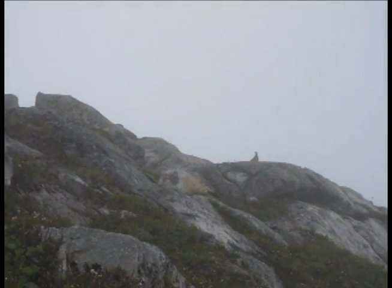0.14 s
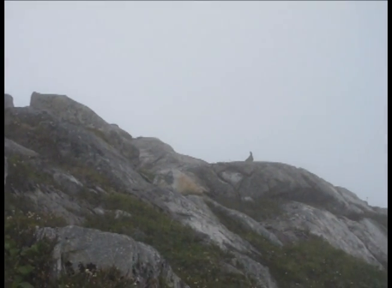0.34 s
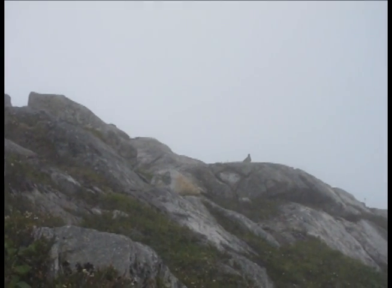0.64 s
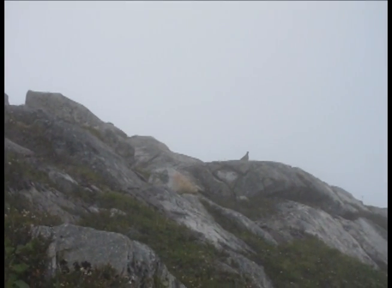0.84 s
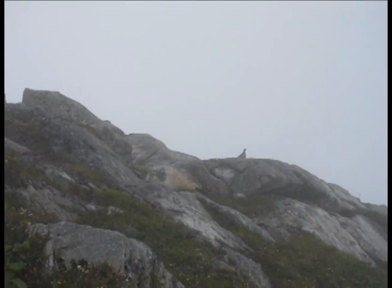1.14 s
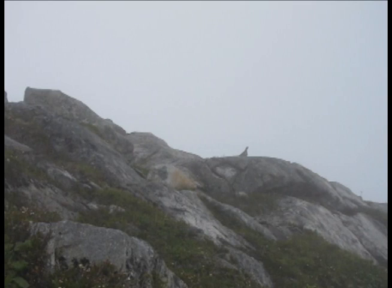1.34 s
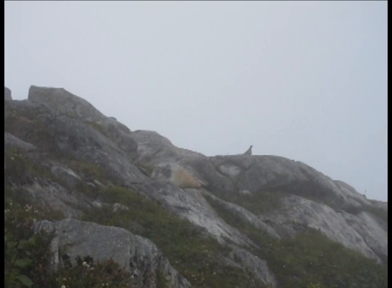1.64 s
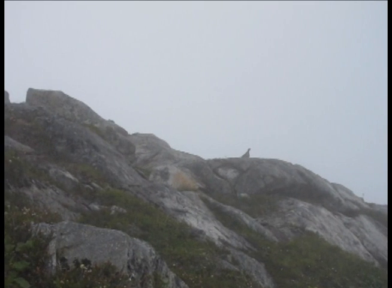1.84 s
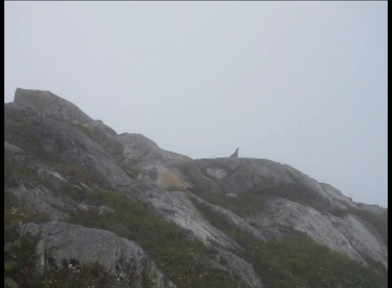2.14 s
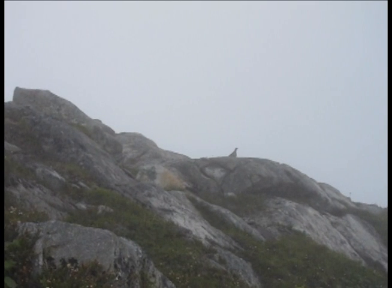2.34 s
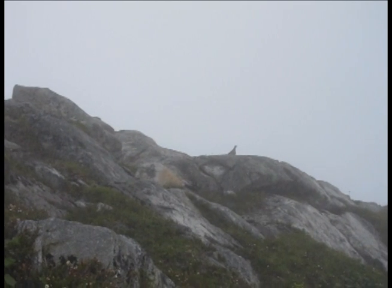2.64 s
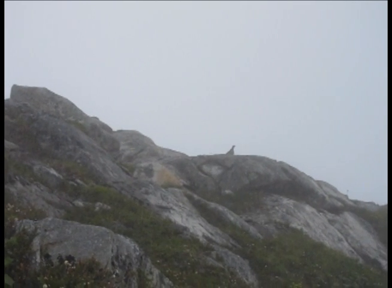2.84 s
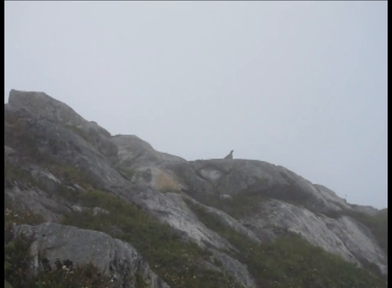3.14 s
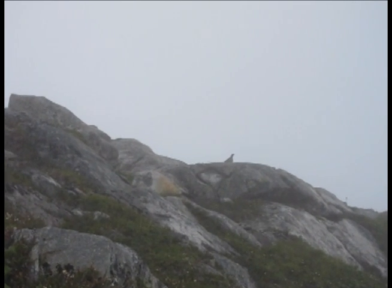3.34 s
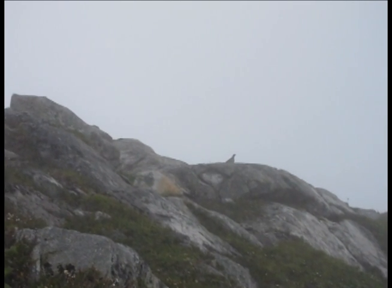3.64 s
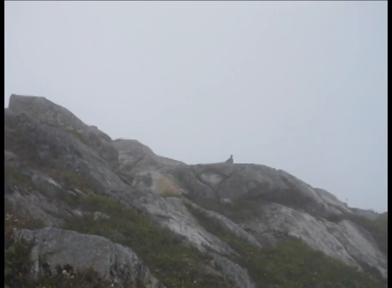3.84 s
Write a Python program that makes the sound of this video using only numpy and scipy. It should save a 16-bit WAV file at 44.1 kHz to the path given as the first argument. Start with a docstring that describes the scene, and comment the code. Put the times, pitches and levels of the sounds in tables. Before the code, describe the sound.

A grouse clucks at about 0.25, 1.55 and 3.2 seconds, each a very short, hollow rattle of quick throat pulses, the last duller, with faint returns from rock. Low wind thumps the microphone until 0.8, stays mostly calm with small bumps near 1.75 and 2.65, thuds at 3.05, then batters strongly from 3.4 to the end. Faint airy hiss swells near 0.6; a barely audible high whirr recurs every second.

```python
"""Grouse on a windy ridge

A grouse clucks three times on a bare ridge: each cluck is a few slow throat pulses ringing the windpipe,
with faint returns from rock. Gusts sweep eddies over the microphone and thump it, above a far wash of air
and a hiss that swells once. A faint high whirr of banded noise comes once a second beside thin tones and one
small tick, and gain control eases loud moments down."""
import sys
import numpy as np
from scipy import signal
from scipy.fft import rfft, irfft
from scipy.io import wavfile
from scipy.ndimage import uniform_filter1d, map_coordinates

SR = 44100
rng = np.random.default_rng(int(sys.argv[2]) if len(sys.argv) > 2 else 0)


def volts_from_db(level):
    """Convert decibel levels to linear amplitude ratios."""
    exponent = np.asarray(level, float) / 20
    return 10 ** exponent


def file_out(sig):
    """Save sig as 16-bit WAV at sys.argv[1]."""
    # one column per channel
    cols = np.atleast_2d(sig).T
    # limit, then scale
    lim = np.clip(cols, -1, 1)
    pcm = np.round(lim * 32767).astype(np.int16)
    wavfile.write(sys.argv[1], SR, pcm)


N = 176400
T = np.arange(N) / SR

# Spectrum of the far air, relative levels: pitch_hz, level_db
WASH = [(35, -26.5), (60, -2), (112, -8.5), (145, -11), (278, -12), (454, -11.5), (690, -16), (1070, -23),
        (1210, -22.5), (1790, -28), (10200, -40), (14500, -46.5), (15600, -49)]
WASH_DB = -48  # rms

# High band that returns regularly; the length is from its top to 1/e
WHIRR_S, WHIRR_EVERY_S, WHIRR_LEN_S = 0.19, 1.0, 0.07
WHIRR_HZ, WHIRR_WIDTH_HZ, WHIRR_DB = 10400, 990, -73
# Thin steady tones, before an 8 dB lift of their peak: pitch_hz, level_db
TONES = [(10045, -99), (14787, -100)]

# Spectrum of the far mid-band swell, relative levels: pitch_hz, level_db
SWELL = [(900, -28), (1180, -9), (1370, 4), (1650, -3), (1850, -10), (2010, -1), (2300, -13), (2650, -6),
         (3100, -17), (4000, -30)]
SWELL_S, SWELL_RISE_S, SWELL_FALL_S, SWELL_DB = 0.59, 0.07, 0.43, -57.5

# Single strong eddies that thump the microphone: start_s (centre), level_db, pitch_hz, direction (push 1, pull -1)
THUMPS = [(.142, -20, 41, 1), (.2254, -19, 41, 1), (.2708, -16, 94, -1), (.2902, -17.5, 48, 1),
          (.4871, -19.5, 34, -1), (.6763, -19, 40, -1), (.7465, -25, 28, -1), (1.7198, -25, 34, 1),
          (1.7861, -22.5, 41, 1), (2.6455, -22, 29, 1), (3.0101, -16.5, 131, 1), (3.0252, -20.5, 41, -1),
          (3.0445, -20, 150, 1), (3.0517, -20, 48, -1), (3.0869, -14, 57, 1), (3.4497, -11.5, 45, 1),
          (3.4721, -11.5, 94, 1), (3.504, -9, 94, 1), (3.523, -11, 60, 1), (3.541, -10, 120, 1),
          (3.58, -12, 90, 1), (3.5993, -11, 94, 1), (3.6588, -8, 182, 1), (3.499, -11, 170, -1),
          (3.7185, -18, 110, -1), (3.6707, -4, 111, 1), (3.6845, -6, 67, 1), (3.7423, -11, 154, 1),
          (3.752, -11, 182, 1), (3.761, -11.5, 300, 1), (3.819, -15, 200, 1), (3.856, -19, 320, 1),
          (3.7728, -10, 215, -1), (3.7973, -8, 280, 1), (3.8328, -6, 105, 1), (3.8721, -10, 300, 1),
          (3.8745, -7.5, 85, 1)]
CREST_DB, CREST_SHARPER, CREST_LAG = -19, 2.2, 0.1  # sharper crest just off the top; random lag in cycles
HUSH, HUSH_CYCLES = 0.7, 0.8  # a strong eddy stills this share of the fine flutter around it

# Buffeting level before a 2.5 dB lift: start_s, level_db
GUST = [(0.0, -45), (0.14, -24.5), (0.18, -30.5), (0.26, -19.5), (0.3, -25), (0.33, -33.5), (0.4, -39.5),
        (0.49, -23), (0.56, -43), (0.61, -41), (0.67, -24.5), (0.71, -37.5), (0.77, -31), (0.95, -41.5),
        (1.28, -40), (1.35, -41.5), (1.51, -40), (1.65, -41), (1.71, -24), (1.75, -31), (1.78, -28),
        (1.9, -41.5), (2.27, -40), (2.43, -30.5), (2.51, -42.5), (2.53, -34.5), (2.61, -36), (2.65, -24.5),
        (2.74, -39.5), (3.09, -20), (3.15, -31), (3.19, -28.5), (3.34, -36), (3.39, -27.5), (3.42, -29.5),
        (3.44, -21.5), (3.53, -17.5), (3.55, -25), (3.63, -20.5), (3.68, -10), (3.71, -24.5), (3.73, -19),
        (3.88, -20.5), (3.9, -29.5), (3.93, -21.5), (4.0, -26)]
# Air speed relative to calm: start_s, speed_db
SPEED = [(0, 0), (.12, -1), (.2, 4.5), (.23, 1), (.27, 6.5), (.32, -2.5), (.5, 0), (.6, -2), (.68, 0.5),
         (1.0, -1), (1.7, -1.5), (1.78, -0.5), (2.4, -2), (2.65, 1), (2.8, 2), (2.97, 3), (3.03, 9.5),
         (3.09, 1.5), (3.3, -0.5), (3.42, 2.5), (3.49, 9.5), (3.56, 8), (3.63, 8), (3.655, 13), (3.68, 10),
         (3.7, 4.5), (3.75, 15.5), (3.8, 15), (3.84, 11), (3.875, 14.5), (3.91, 8.5), (4, 7.5)]
# Spectrum of the eddies at calm speed, relative levels: pitch_hz, level_db
EDDIES = [(3, -8), (8, -1), (20, 5.5), (40, -5.5), (60, -8.5), (90, -16.5), (140, -26), (200, -42),
          (280, -79), (400, -130)]
LUMP_DB, LUMP_HZ, SKEW = 3.5, 15.8, 0.29  # uneven strength, its rate at calm speed, lopsided waveform

# Small dry ticks: start_s, level_db (starting peak), pitch_hz
TICKS = [(1.6846, -45.5, 2560)]

# Clucks, levels before the final halving:
# loudest_s, pulse_rate_hz, level_db, lower_pitch_ratio, upper_pitch_ratio, brightness_db_per_octave
CLUCKS = [(0.2495, 160.8, -23, 1.01, 1.015, 1.5), (1.5655, 152, -21, 0.96, 0.98, -.5),
          (3.2094, 142.4, -24.5, 1.0, 1.07, -6.5)]
# Soft opening pulse of each cluck: start_s
FIRST_PULSE_S = [.2355, 1.5481, 3.1946]
# Windpipe rings, relative levels: pitch_hz, level_db, t60_s
PIPE = [(1125, -5, .012), (1615, 0, .020), (3330, -8, .019), (4570, -14.5, .013)]
# Brief rings at the front of each pulse, relative levels: pitch_hz, level_db, t60_s
SNAP = [(2180, -11.5, 0.002), (3900, -27, 0.0013), (5970, -18, .004), (8200, -32, .003)]
# Starting direction of each ring, windpipe first, then front: direction (1 or -1)
SIGNS = [-1, 1, 1, 1, 1, -1, 1, 1]
# Spectrum of the puff of air, relative levels: pitch_hz, level_db
RASP = [(600, -27), (1300, -4.5), (2400, 4), (4200, -8.5), (6500, -21), (10000, -33)]
RASP_DB, RASP_T60_S = -18, 0.006
OPEN_S, LEAD_RAD = 0.00004, 0.28  # rise constant; the folds snap shut, so rings start a little into their swing
ARCH_DB, ARCH_S, ARCH_POWER = -5.5, 0.012, 2.5  # flat-topped effort: down by ARCH_DB at ARCH_S from the top
FIRST_GAP, SLOW_PER_DB = 1.06, 0.004  # longer first period (in periods); weak effort stretches periods
LIMP_S, JITTER_S = 0.00006, 0.00004  # pulses alternate late and early; all are slightly uneven
DULL_DB, SAG_PER_DB = 1.62, 0.005  # per dB of lost effort: dB per octave duller, lower rings flatter (share)
WOBBLE_DB, WOBBLE = 1.2, 0.008  # random level of each pulse, random pitch share of each ring

ROCK_DB, ROCK_T60_S, ROCK_START_S = -27, 0.12, 0.031


def evened(x):
    """Scales to rms 1."""
    return x / np.sqrt(np.mean(x ** 2) + 1e-20)


def read(points, hz):
    """Reads a spectrum table on a log frequency axis."""
    f, value = np.transpose(points)
    return np.interp(np.log(hz + 1), np.log(f + 1), value)


def add(mix, s, sound):
    """Mixes a sound in at time s."""
    part = mix[round(s * SR):][:len(sound)]
    part += sound[:len(part)]


def coloured(points, size, rate_hz):
    """Noise with the given spectrum, at rms 1."""
    spectrum = rfft(rng.standard_normal(size))
    shape = volts_from_db(read(points, np.fft.rfftfreq(size, 1 / rate_hz)))
    return evened(irfft(spectrum * shape, size))


def wash():
    """Far air and hiss: noise shaped in short frames, with faint drifting patches in time and pitch."""
    frames, hz = N // 256 + 5, np.fft.rfftfreq(1024, 1 / SR)
    a, b, patches = rng.standard_normal((frames, 513, 3)).T
    patches = uniform_filter1d(patches, size=14, axis=0)
    patches = evened(uniform_filter1d(patches, size=12, axis=1))
    z = (a + 1j * b) * volts_from_db(read(WASH, hz)[:, None] + 0.94 * patches)
    air = signal.istft(z, nperseg=1024, noverlap=768)[1][:N]
    return volts_from_db(WASH_DB) * evened(air)


def tones():
    """Thin steady sine tones high in the treble."""
    return sum(volts_from_db(db + 8) * np.sin(2 * np.pi * hz * T) for hz, db in TONES)


def whirr():
    """A soft high band of noise under a rounded envelope that returns once a second."""
    away = (T - WHIRR_S + WHIRR_EVERY_S / 2) % WHIRR_EVERY_S - WHIRR_EVERY_S / 2
    shape = [(WHIRR_HZ + k * WHIRR_WIDTH_HZ, db) for k, db in zip(range(-2, 3), (-40, -9, 0, -9, -40))]
    return volts_from_db(WHIRR_DB) * np.exp(-(away / WHIRR_LEN_S) ** 2) * coloured(shape, N, SR)


def swell():
    """A banded hiss that rises quickly, wavers and fades."""
    away = (T - SWELL_S) / np.where(T < SWELL_S, SWELL_RISE_S, SWELL_FALL_S)
    waver = coloured([(1, -3), (12, 1), (30, -40), (60, -100)], N, SR)
    return volts_from_db(SWELL_DB + 2.8 * waver) * np.exp(-away ** 2) * coloured(SWELL, N, SR)


def buffet():
    """A frozen row of lumpy eddies is swept past the microphone: faster air sounds higher."""
    speed = volts_from_db(np.clip(np.interp(T, *np.transpose(SPEED)), -6, 19))
    size, rate = 2 ** 17, 4000  # points in the row, points per second at calm speed
    eddies = coloured(EDDIES, size, rate)
    lumps = coloured([(1, 0), (LUMP_HZ, -3), (2 * LUMP_HZ, -40), (4 * LUMP_HZ, -120)], size, rate)
    skewed = eddies + SKEW * (eddies ** 2 - 1)
    row = evened(skewed * volts_from_db(LUMP_DB * lumps))
    place = np.cumsum(uniform_filter1d(speed, size=400)) * rate / SR
    swept = map_coordinates(row, [place], order=4)
    # Even out the slow level, so the gust table shapes the loudness
    power = uniform_filter1d(uniform_filter1d(swept ** 2, size=2500), size=2500)
    swept = swept / np.sqrt(abs(power) + 0.1)
    gust_db = uniform_filter1d(np.interp(T, *np.transpose(GUST)), size=400)
    return volts_from_db(gust_db + 2.5) * evened(swept)


def bump(cycles):
    """One rounded push between two shallow pulls."""
    square = (np.pi * cycles) ** 2
    return (1 - 2 * square) * np.exp(-square)


def thumps():
    """Strong eddies press or pull the microphone once each; returns them and the calm they leave."""
    s, db, hz, way = np.transpose(THUMPS)[:, :, None]
    cycles = hz * (T - s)
    lag = CREST_LAG * rng.standard_normal(s.shape)
    crest = volts_from_db(CREST_DB) * bump(CREST_SHARPER * (cycles - lag))
    calm = np.prod(1 - HUSH * np.exp(-(cycles / HUSH_CYCLES) ** 2), axis=0)
    return np.sum(np.sign(way) * volts_from_db(db) * (bump(cycles) + crest), axis=0), calm


def ticks():
    """Small dry ticks, each a sine that dies within milliseconds."""
    out, t = np.zeros(N), np.arange(300) / SR
    for s, db, hz in TICKS:
        add(out, s, volts_from_db(db - 60 * t / 0.0081) * np.sin(2 * np.pi * hz * t))
    return out


def rocks(x):
    """Faint scattered, thin returns from the slabs: a delayed, decaying noise tail convolved with the bird."""
    t = np.arange(12000) / SR
    noise = coloured([(800, -12), (1600, -8), (3400, 4), (8000, -6)], len(t), SR)
    tail = noise * volts_from_db(-60 * t / ROCK_T60_S) * (t > ROCK_START_S)
    return volts_from_db(ROCK_DB) * signal.fftconvolve(x, tail / np.linalg.norm(tail))[:N]


def pulse_times(first_s, top_s, rate_hz):
    """Seven near-even throat pulses under one arch of effort: their times and effort in dB."""
    at = np.r_[0, FIRST_GAP + np.arange(6)] / rate_hz
    effort_db = ARCH_DB * abs((first_s + at - top_s) / ARCH_S) ** ARCH_POWER
    stretch = 1 - SLOW_PER_DB * (effort_db[1:] + effort_db[:-1]) / 2
    at = np.r_[0, np.cumsum(np.diff(at) * stretch)]
    uneven = LIMP_S * (-1.) ** np.arange(7) + JITTER_S * rng.standard_normal(7)
    return abs(at + uneven), effort_db


def cluck(first_s, top_s, rate_hz, db, low_share, share, tilt_db):
    """Each throat pulse sets the windpipe ringing as damped sines and lets out a puff of air."""
    t, out = np.arange(1500) / SR, np.zeros(4500)
    at, effort_db = pulse_times(first_s, top_s, rate_hz)
    hz, ring_db, t60 = np.transpose(PIPE + SNAP)[:, :, None]
    for s, e_db in zip(at, effort_db):
        level_wobble, pitch_wobble = rng.standard_normal((2, len(SIGNS), 1))
        brightness_db = (tilt_db + DULL_DB * e_db) * np.log2(hz / 1500)
        level_db = db + e_db + WOBBLE_DB * level_wobble + ring_db + brightness_db
        ratio = np.where(hz > 2500, share, low_share * (1 + SAG_PER_DB * e_db))
        pitch = hz * ratio * (1 + WOBBLE * pitch_wobble)
        rings = volts_from_db(level_db - 60 * t / t60) * np.sin(2 * np.pi * pitch * t + LEAD_RAD)
        add(out, s, (1 - np.exp(-t / OPEN_S)) * np.dot(SIGNS, rings))
        puff = coloured([(f, d + tilt_db * np.log2(f / 1500)) for f, d in RASP], len(t), SR)
        add(out, s, volts_from_db(db + e_db + RASP_DB - 60 * t / RASP_T60_S) * puff)
    return 0.5 * out


def scene():
    """Air, wind, ticks and bird in one channel."""
    far = wash() + tones() + whirr() + swell()
    push, calm = thumps()
    wind = push + calm * buffet()
    bird = np.zeros(N)
    for first_s, row in zip(FIRST_PULSE_S, CLUCKS):
        add(bird, first_s, cluck(first_s, *row))
    return (far + wind + ticks() + bird + rocks(bird))[None]


def gain_control(x):
    """Takes off half the dB by which smoothed power tops a threshold; falls fast, recovers at a steady rate."""
    threshold_db, share, recover_db_per_s = -18, 0.5, 2.0
    power_db = 10 * np.log10(abs(uniform_filter1d(x[0] ** 2, size=3000)) + 1e-12)
    fall = T * recover_db_per_s
    held_db = np.maximum.accumulate(power_db + fall) - fall
    over_db = np.maximum(held_db - threshold_db, 0)
    return x / volts_from_db(share * uniform_filter1d(over_db, size=2000))


def band_limit(x):
    """A steep low-pass at the top of the band."""
    return signal.sosfilt(signal.butter(12, 15710, fs=SR, output="sos"), x)


def record(dry):
    """The microphone's path: a 15 Hz low cut, then gain control."""
    x = signal.lfilter(*signal.butter(1, 15, "high", fs=SR), dry)
    mix = gain_control(x)
    return band_limit(mix)


dry = scene()
out = record(dry)
file_out(out)
```